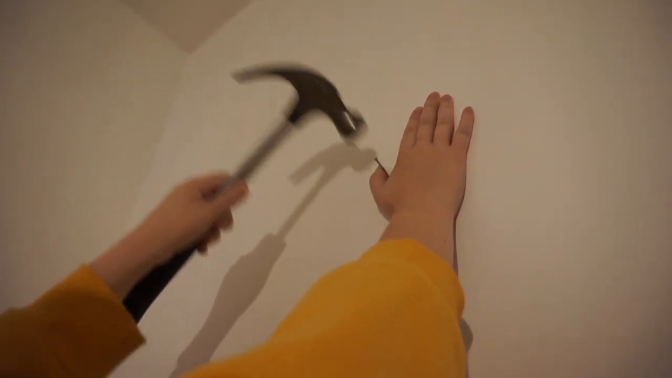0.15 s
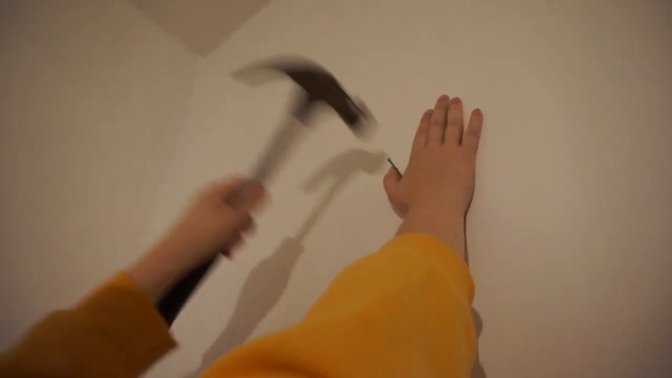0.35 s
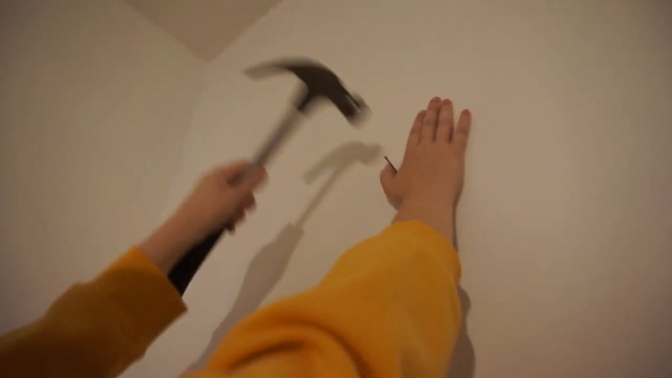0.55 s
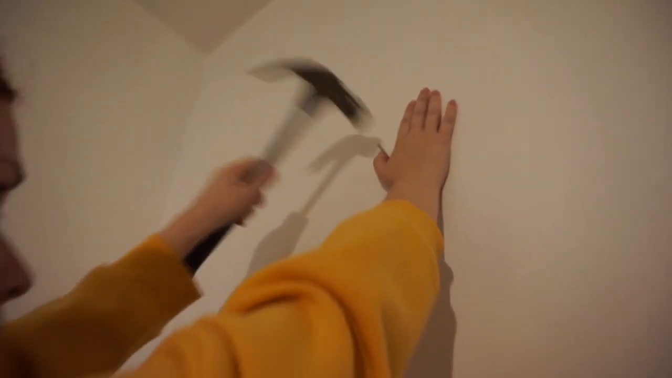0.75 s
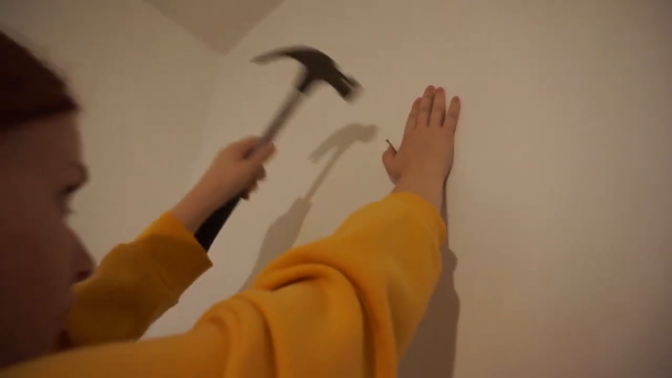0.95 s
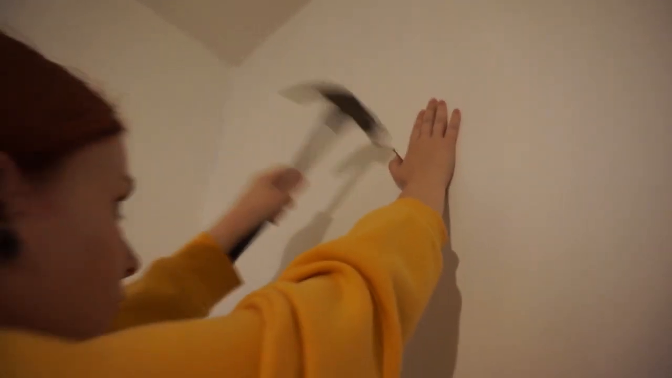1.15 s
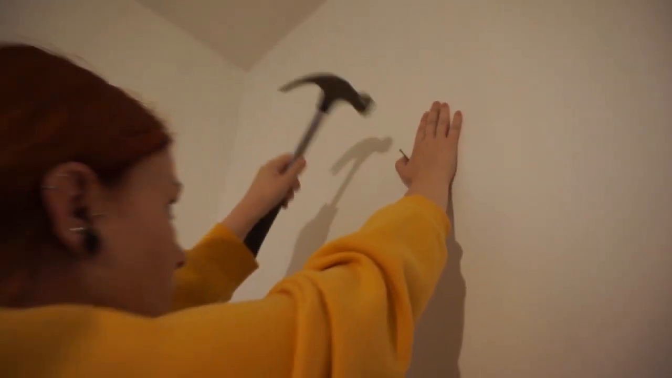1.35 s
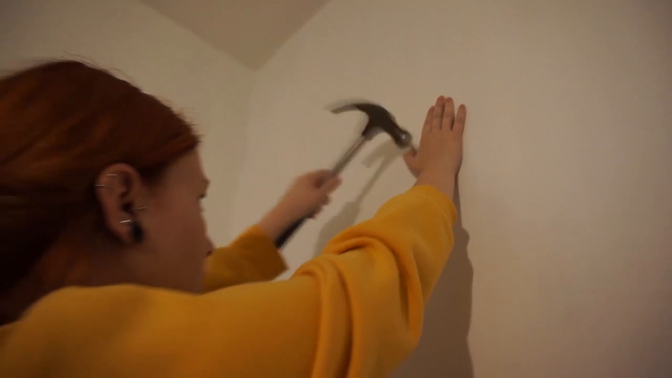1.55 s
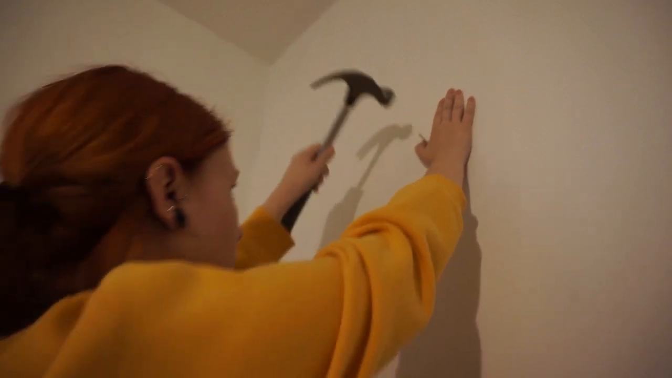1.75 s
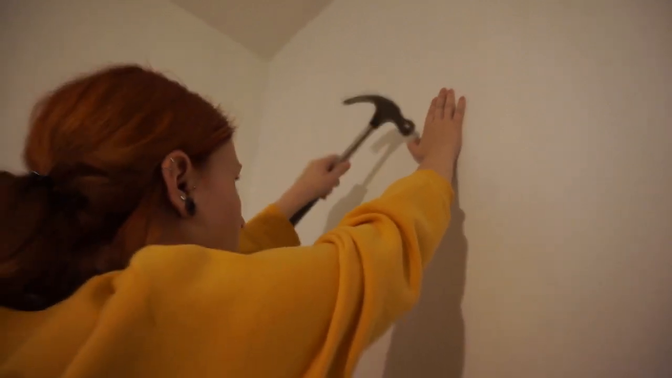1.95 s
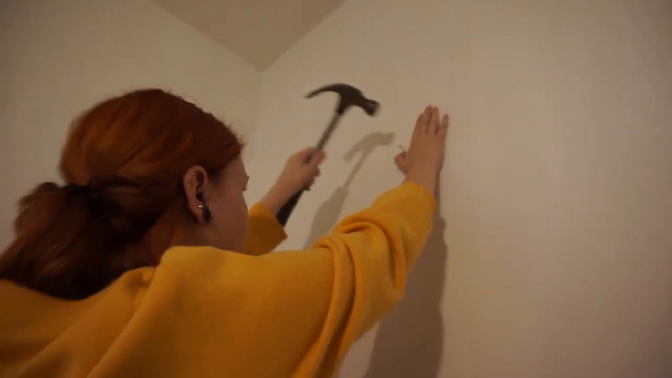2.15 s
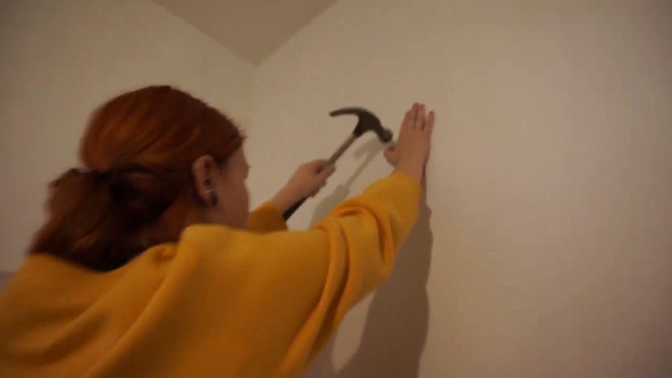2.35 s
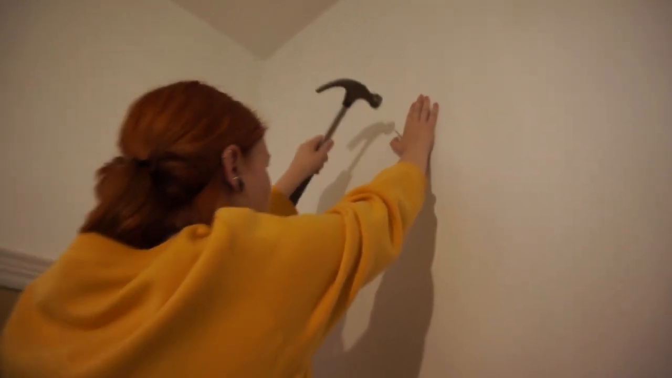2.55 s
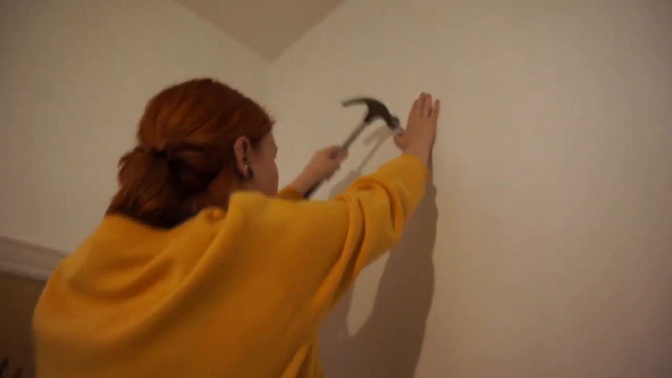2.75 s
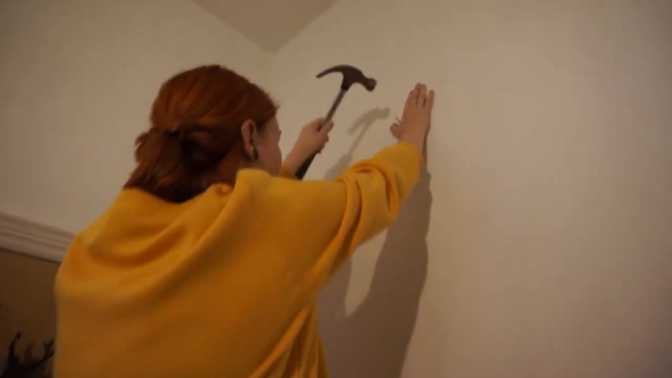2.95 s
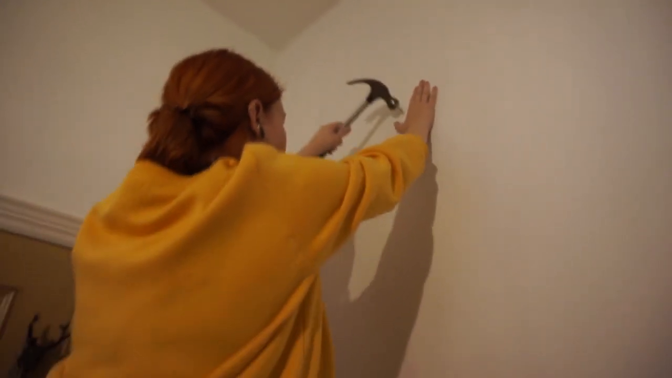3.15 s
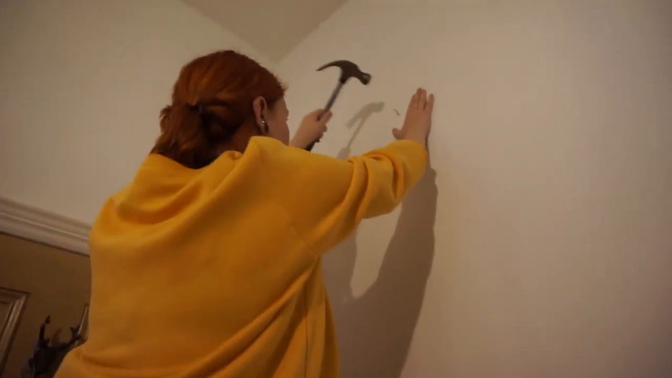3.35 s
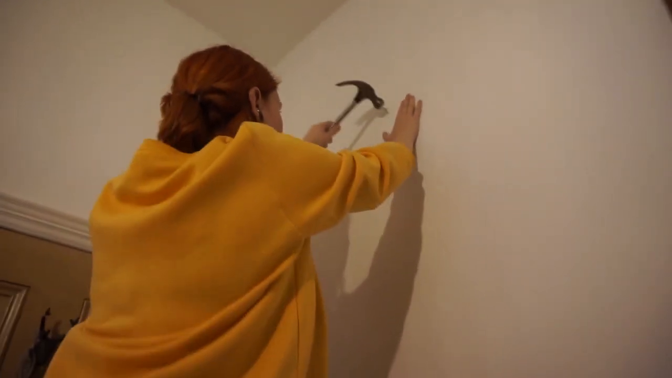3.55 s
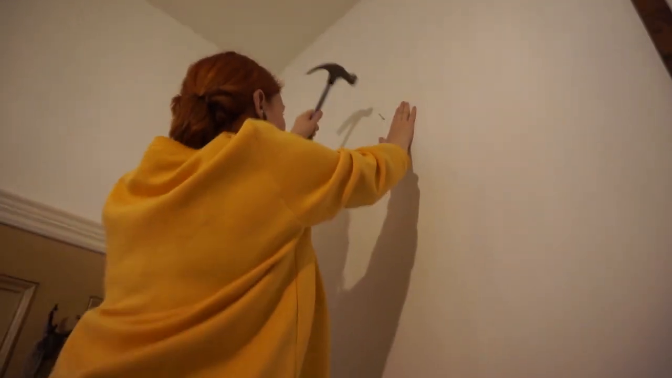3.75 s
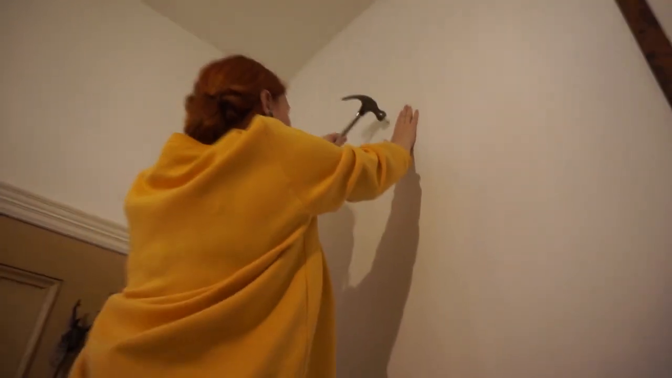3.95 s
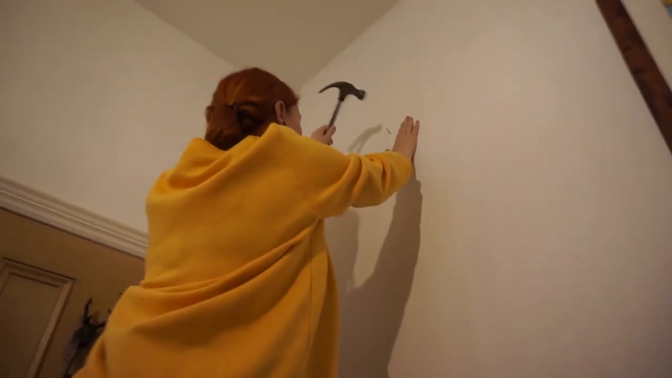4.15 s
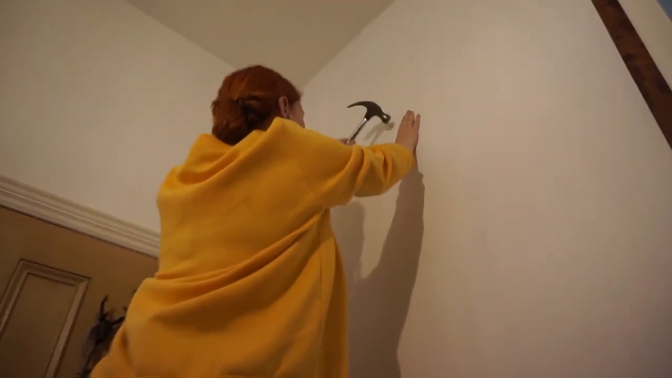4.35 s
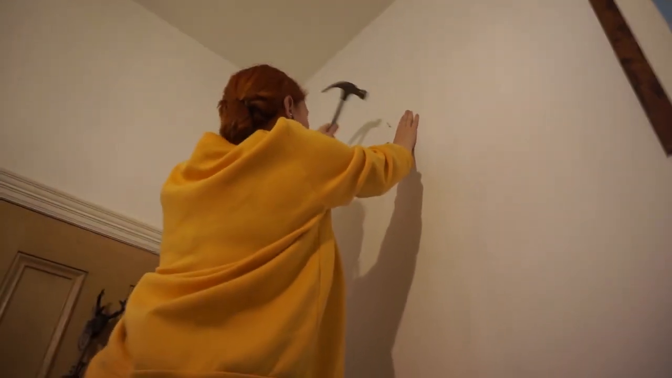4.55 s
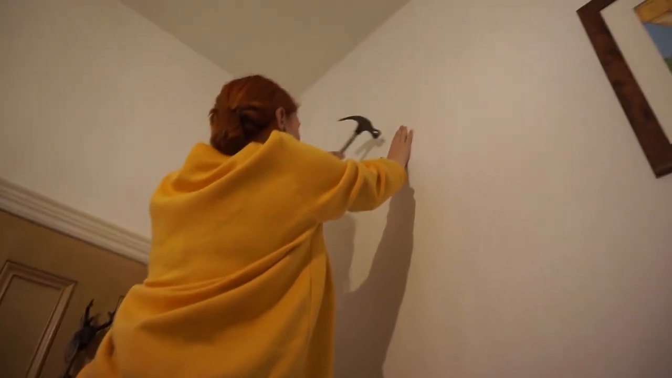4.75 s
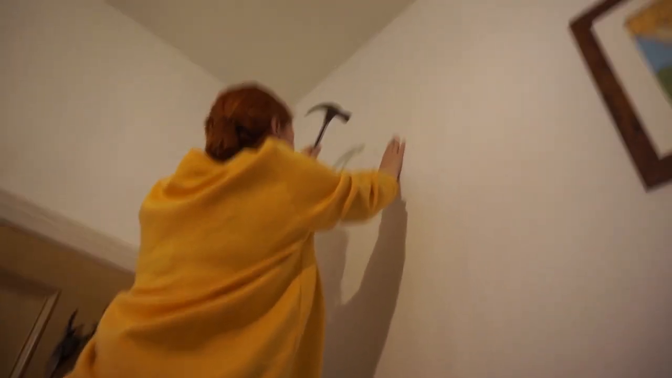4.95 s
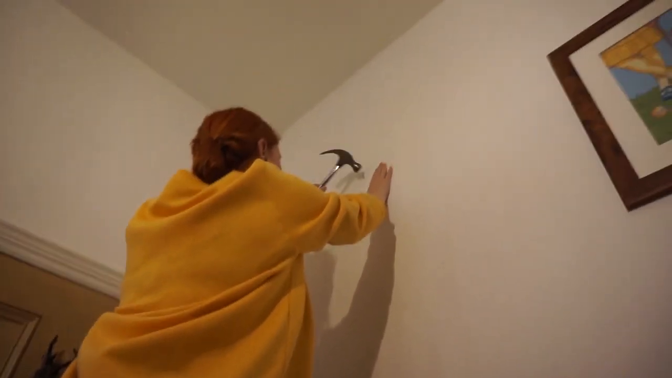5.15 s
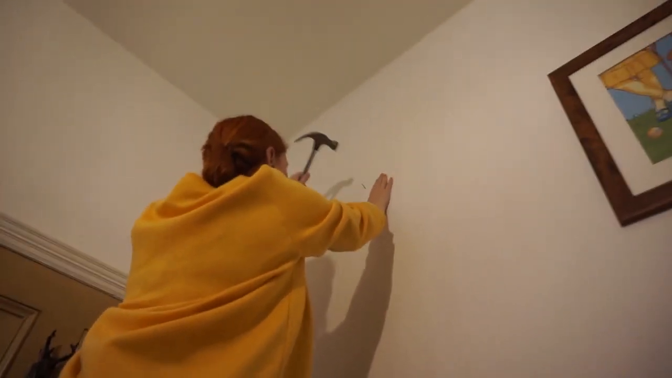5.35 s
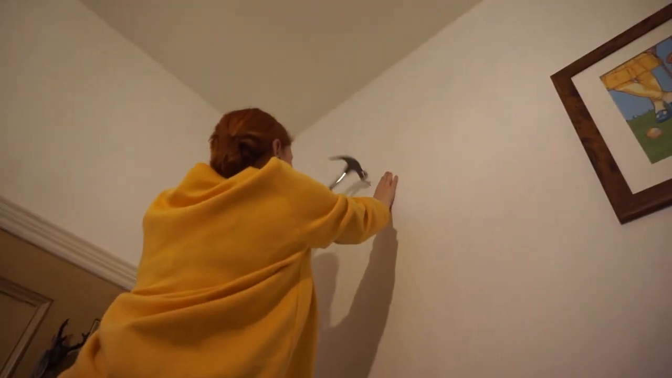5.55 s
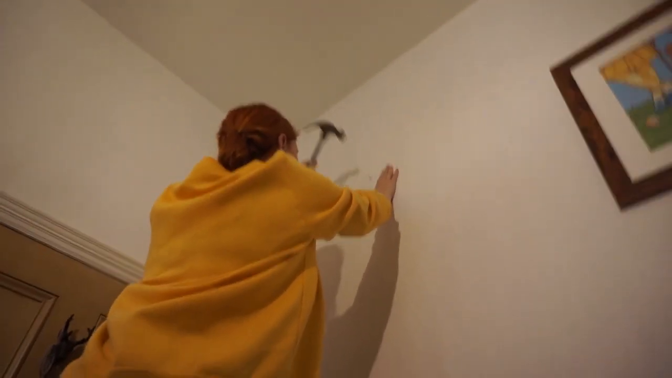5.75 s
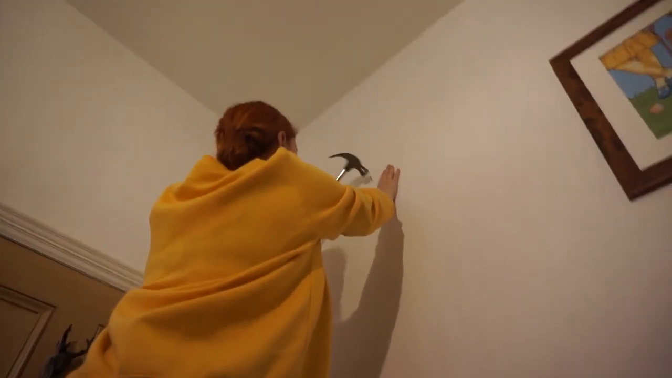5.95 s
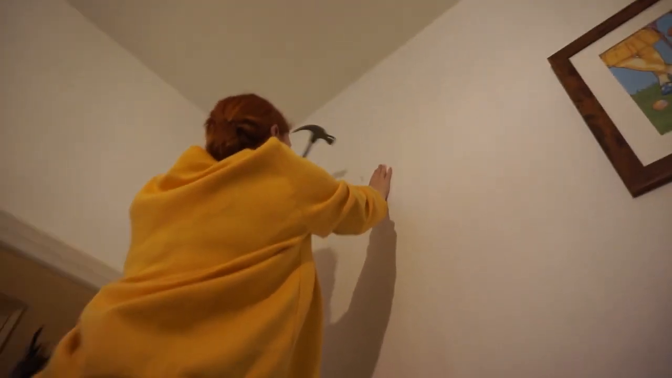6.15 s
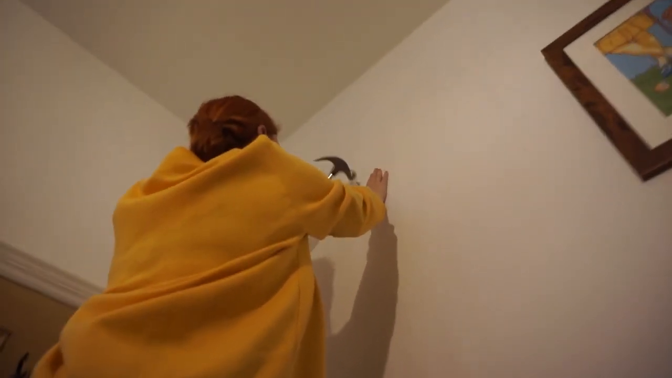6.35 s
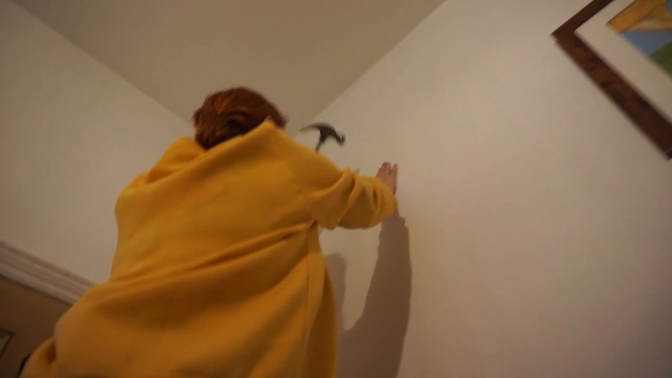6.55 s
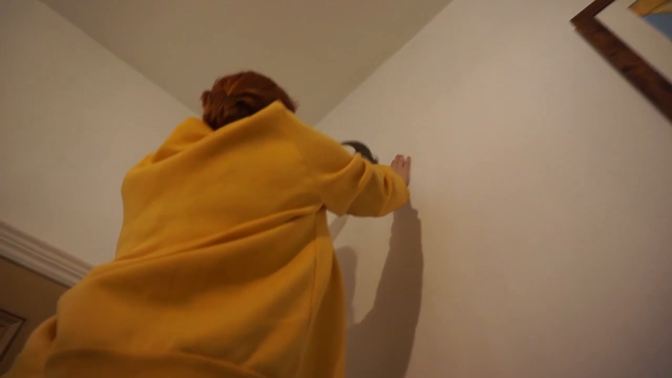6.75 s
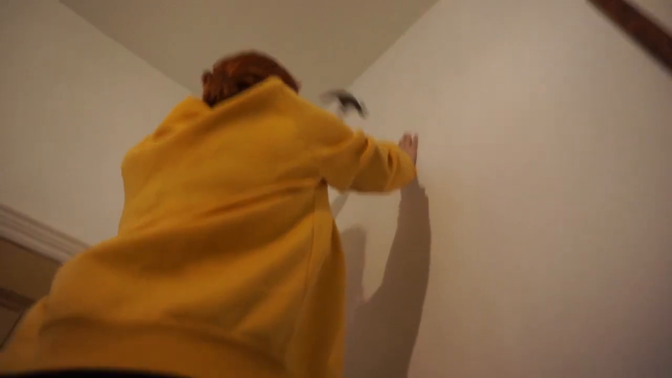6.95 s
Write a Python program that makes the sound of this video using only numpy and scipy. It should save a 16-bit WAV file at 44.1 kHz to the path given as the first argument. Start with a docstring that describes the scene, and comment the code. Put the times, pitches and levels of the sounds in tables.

```python
"""Near the corner of a room, a claw hammer drives a nail into a painted wall, about 2.5 blows a second.
The first taps are bright and the free shank sings in its bending modes; as the nail sinks, the wall
takes over with a hollow knock. Ceiling and side wall reflect at once, then the room reverberates.
Over a faint hiss, something small and hard clacks once just after a blow, and later a focus motor
chirps faintly beside the microphone."""
import sys
import numpy as np
from scipy import signal
from scipy.fft import rfft, irfft
from scipy.io import wavfile

SR = 44100
rng = np.random.default_rng(int(sys.argv[2]) if len(sys.argv) > 2 else 0)


def wav_record(signal):
    """Record a signal, one row per channel, as 16-bit PCM in the file named by sys.argv[1]."""
    frames = np.transpose(np.atleast_2d(signal))
    bounded = np.clip(frames, -1, 1)
    # unit amplitude maps onto the largest positive 16-bit level
    quanta = np.round(bounded * 32767).astype(np.int16)
    wavfile.write(sys.argv[1], SR, quanta)


N = 312915
BLOW_S, FFT_SIZE = 0.8, 2 ** 16
AGE = np.arange(int(BLOW_S * SR)) / SR   # time since an impact, t/s
HZ = np.maximum(np.fft.rfftfreq(FFT_SIZE, 1 / SR), 1)


def from_db(db):
    """Amplitude ratio of a level: tenfold for every 20 dB."""
    return 10 ** (np.asarray(db) / 20)


def at_hz(points, hz):
    """Interpolation of (f/Hz, value) points on a logarithmic frequency axis."""
    points = np.array(points)
    return np.interp(np.log(hz), np.log(points[:, 0]), points[:, 1])


def hump(hz, octaves):
    """Gaussian bell of height 1 on the logarithmic frequency axis."""
    return np.exp(-(np.log2(HZ / hz) / octaves) ** 2)


def glide(from_hz, to_hz, share):
    """Geometric interpolation: equal shares span equal pitch intervals."""
    return from_hz * (to_hz / from_hz) ** share


def panned(db):
    """Left and right gains for an interchannel level difference, positive to the left."""
    return from_db(np.array([[db], [-db]]) / 2)


def causal(db):
    """Minimum-phase response with these levels: no sound precedes its cause."""
    cepstrum = irfft(np.log(from_db(db)))
    cepstrum[1:FFT_SIZE // 2] *= 2
    cepstrum[FFT_SIZE // 2 + 1:] = 0
    return np.exp(rfft(cepstrum))


def to_time(spectrum):
    """Inverse Fourier transform, one blow long, faded over the last 0.1 s."""
    return irfft(spectrum)[:, :len(AGE)] * np.minimum((BLOW_S - AGE) * 10, 1)


def add(out, sound, start_s):
    """Linear superposition of a stereo sound from start_s on."""
    at = int(round(start_s * SR))
    first, last = max(at, 0), min(at + sound.shape[1], N)
    out[:, first:last] += sound[:, first - at:last - at]


def mode(hz, db, t60, phase):
    """Free vibration of a damped oscillator whose resonance peak stands at db."""
    tau = t60 / np.log(1000)
    return from_db(db) * 2 / (tau * SR) * np.exp(-AGE / tau) * np.sin(2 * np.pi * hz * AGE + phase)


def joint_colour(grip, seat, trough_db=-7, knock_db=9):
    """Coupling of nail and board: a treble trough falls with the grip, a knock rises as the nail seats."""
    takeover = np.clip(seat / 0.33, 0, 1)
    trough = trough_db * hump(glide(11200, 5340, grip), octaves=0.44)
    knock = knock_db * hump(glide(380, 545, seat), octaves=0.72)
    return (1 - takeover) * trough + takeover * knock


def stroke_colour(bright_db, null_hz, null_db=-11, lobe_db=4):
    """Finite contact time leaves a spectral null with a lobe above it; a squarer hit is brighter."""
    tilt = at_hz([(700, 0), (3500, bright_db)], HZ)
    return tilt + null_db * hump(null_hz, octaves=0.16) + lobe_db * hump(1.267 * null_hz, octaves=0.16)


def linger():
    """Group delay: all-pass resonances stretch a click into a burst of a few cycles."""
    # resonances of nail and board: f/Hz, bandwidth/Hz
    resonances = [(2400, 510), (4000, 840), (6000, 1200)]
    response = 1
    for hz, width_hz in resonances:
        pole = hz ** 2 - HZ ** 2 + 1j * HZ * width_hz
        response = response * np.conj(pole) / pole
    return response


def contact(depth, bright_db, null_hz, grip_depth=0.6):
    """Impact excitation: the spectrum passes from free to gripped to seated as the nail sinks."""
    # contact while the nail stands free: f/Hz, level/dB
    free = [(140, 1.5), (290, 10), (550, 6), (1000, -2.5), (2300, -0.5), (4200, 5.5), (6500, -2),
            (10000, -10)]
    # contact once the wall grips the shank: f/Hz, level/dB
    gripped = [(140, 8.5), (290, 16.5), (550, 14.5), (1000, 11), (2300, 2.5), (4200, 5), (6500, 2),
               (10000, -5.5)]
    # contact with the nail driven home: f/Hz, level/dB
    seated = [(140, 1), (290, 11), (550, 16.5), (1000, 14.8), (2300, 6.7), (4200, -8), (6500, -22.5),
              (10000, -19)]
    # radiation of any blow by the wall: f/Hz, level/dB
    radiation = [(30, -35), (72, -19.5), (108, -3.5), (230, -4.5), (285, -3.5), (325, -9), (385, -3),
                 (490, -0.5), (680, -0.5), (950, -1.5), (1600, -8), (2200, -3), (5000, -5), (11000, -7.5)]
    grip = np.clip(depth / grip_depth, 0, 1)
    seat = np.clip((depth - grip_depth) / (1 - grip_depth), 0, 1)
    stage_db = (1 - grip) * at_hz(free, HZ) + (grip - seat) * at_hz(gripped, HZ) + seat * at_hz(seated, HZ)
    colour_db = joint_colour(grip, seat) + stroke_colour(bright_db, null_hz) + at_hz(radiation, HZ)
    return causal(stage_db + colour_db) * linger()


def direct_path(time_s, low_hz=500, high_hz=3000, bass_hz=330, jitter_s=0.00013):
    """Interference of direct sound and two reflections; the shoulder increasingly shadows the treble."""
    # direct sound against the room: t/s, level at low_hz/dB, level at high_hz/dB
    shadow = [(0, -7.5, 6), (1.202, -3.5, 5.5), (2.999, -7.5, 3), (4.4, -5, 1), (5.2, -0.5, -3),
              (7.1, -3, -9)]
    # reflections from ceiling and side wall: delay/s, relative gain, left minus right/dB
    echoes = [(.0033, 1, 7), (.0053, 0.37, -16.5)]
    times, lows, highs = np.transpose(shadow)
    low_db, high_db = np.interp(time_s, times, lows), np.interp(time_s, times, highs)
    shade_db = at_hz([(low_hz, low_db), (high_hz, high_db)], HZ)
    bass_cut_db = -10 * np.log10(1 + (bass_hz / HZ) ** 2)
    mirror = from_db(at_hz([(low_hz, -7), (high_hz, 0)], HZ))   # short waves reflect cleanly
    paths, power = np.ones((2, 1)), 1
    for delay, gain, pan_db in echoes:
        lag = delay + jitter_s * (rng.normal() + 0.1 * rng.normal(size=(2, 1)))
        paths = paths + gain * mirror * panned(pan_db) * np.exp(-2j * np.pi * HZ * lag)
        power = power + (gain * mirror) ** 2
    return causal(shade_db + bass_cut_db) * paths / np.sqrt(power)


def shank(ring_db):
    """Resonant filtering: the shank colours the click for as long as it stands free."""
    # peaks and dips of the free shank: f/Hz, width/Hz, level/dB
    bands = [(2300, 150, 5), (2900, 350, -7), (3800, 180, 4), (4350, 280, 5), (5350, 250, 5),
             (6500, 800, 7), (9800, 1300, -7)]
    freedom = np.clip(0.5 + ring_db / 24, 0, 1)
    colour_db = sum(db * np.exp(-((HZ - hz) / width_hz) ** 2) for hz, width_hz, db in bands)
    return causal(freedom * colour_db)


def plaster_crunch(share=0.39, decay_s=0.0018, above_hz=1500):
    """Friction noise: a brief slip through plaster roughens the treble of a click."""
    grit = rng.standard_normal(len(AGE)) * np.exp(-AGE / decay_s)
    noisy_share = share / (1 + (above_hz / HZ) ** 2)
    return np.sqrt(1 - noisy_share) + np.sqrt(noisy_share) * rfft(grit / np.linalg.norm(grit), FFT_SIZE)


def wall(modes, phases, build_s=0.012, scatter_db=2.5):
    """Panel modes build up as bending waves cross the wall; each blow weights them anew."""
    ringing = sum(mode(hz, db + scatter_db * rng.normal(), t60, phase)
                  for (hz, db, t60), phase in zip(modes, phases))
    return rfft(ringing * (1 - np.exp(-AGE / build_s)), FFT_SIZE)


def steel(modes, spread, count):
    """Beating: clusters of close steel modes, each reaching the two ears with different phases."""
    out = 0
    for hz, db, t60 in modes:
        for offset in np.linspace(-1, 1, count) + rng.uniform(-0.12, 0.12, count):
            phase = rng.uniform(0, 2 * np.pi) + rng.normal(0, 0.57, (2, 1))
            out = out + mode(hz * (1 + spread * offset), db, t60, phase)
    return out / np.sqrt(count)


def room_tail(gap_s=0.0063, build_s=0.0025):
    """Diffuse field: third-octave noise bands, each decaying exponentially at its own rate."""
    # reverberation time: f/Hz, T60/s
    decay = [(100, 0.39), (260, 0.38), (700, 0.48), (1200, 0.61), (2200, 0.59), (4500, 0.4333),
             (7000, 0.4465), (11000, 0.4054)]
    # strength of the reverberation: f/Hz, level/dB
    levels = [(100, -1), (300, 4), (550, -4.5), (1000, 0.5), (4000, 1.5), (11000, 0.5)]
    # stereo width: f/Hz, side against mid/dB
    width = [(120, -23), (250, -18.5), (500, -10), (1000, -5), (2000, 1), (10000, -2)]
    out = np.zeros((2, len(AGE)))
    white = rfft(rng.standard_normal((2, FFT_SIZE)))
    edges_hz = np.geomspace(20, 16000, 30)
    swell = 1 - np.exp(-np.maximum(AGE - gap_s, 0) / build_s)
    for low, high in zip(edges_hz, edges_hz[1:]):
        hz = np.sqrt(low * high)
        band = irfft(white * ((HZ >= low) & (HZ < high)))[:, :len(AGE)]
        band = band * swell * from_db(-60 * AGE / at_hz(decay, hz))
        energy = np.sum(band ** 2, axis=1, keepdims=True)
        mid, side = band * np.sqrt(2 * (high - low) / SR / energy)
        out += from_db(at_hz(levels, hz)) * (mid + from_db(at_hz(width, hz)) * side * [[1], [-1]])
    return rfft(out, FFT_SIZE)


def hammering(free_ring_db=4, ring_loss_db=52):
    """Convolution: each blow excites direct path, wall and a room that shifts as the microphone moves."""
    # hammer blows: t/s, relative level/dB, brightness/dB, contact null f/Hz
    blows = [(-0.25, 2, 0, 680), (0.1127, 0.5, 0, 674), (0.4647, -0.5, 0.5, 640), (0.8524, -1, 0.5, 650),
             (1.2465, -0.05, -1.5, 637), (1.6119, 0.6, 0, 555), (2.002, 0, 1, 548),
             (2.3893, 1.15, -0.5, 570), (2.7726, 1, -2, 605), (3.171, -0.46, -2, 560),
             (3.571, -0.5, 0.5, 585), (3.9869, 0, 1.5, 523), (4.381, 0.5, 0.5, 502), (4.7754, 1.5, 0, 1080),
             (5.1862, 1.8, -2.2, 1050), (5.5917, -0.5, -2.5, 1214), (5.9989, -0.5, -1, 1330),
             (6.3972, 0.2, 0, 1450), (6.8063, -1, 2, 1430)]
    # sinking of the nail: t/s, share of its travel
    travel = [(0.11, 0.03), (1.25, 0.13), (2.77, .39), (4.38, 0.62), (4.78, 0.69), (5.19, 0.83),
              (5.59, 0.92), (6.81, 0.99)]
    # modes of the wall panel: f/Hz, level/dB, T60/s
    wall_modes = [(120.5, 7.5, 0.34), (170.8, 11, 0.4), (220.4, 11.5, 0.53), (266.3, 2, 0.22),
                  (288.3, 5.5, 0.4), (345.7, 7.5, .36), (389, 7, 0.35), (450, 11, 0.42), (489.5, 9, 0.24),
                  (662, 9.5, 0.22), (895, 8, 0.54), (1240, 11, 0.22), (1370, 9.5, .7), (2550, 6, 0.61),
                  (3670, 6, .7)]
    # bending modes of the free shank: f/Hz, level/dB, T60/s
    nail_modes = [(1930, 15, 0.9), (2200, 18, 0.66), (2300, 21.5, 0.75)]
    # blows that set the steel singing: t/s, f/Hz, level/dB, T60/s, relative spread of the cluster
    steel_rings = [(2.7725, 4850, 9, .45, 0.036), (4.382, 10000, 15.5, 0.29, 0.036),
                   (4.776, 7550, 14, 0.38, 0.067), (5.184, 8920, 14.5, .42, 0.02),
                   (5.5915, 8900, 4, 0.32, .02)]
    out = np.zeros((2, N))
    tails = [room_tail() for _ in range(7)]
    phases = rng.uniform(0, 2 * np.pi, len(wall_modes))
    for start_s, strength_db, bright_db, null_hz in blows:
        depth = np.interp(start_s, *np.transpose(travel))
        ring_db = free_ring_db - ring_loss_db * depth
        progress = np.clip(start_s * SR / N, 0, 0.999)
        place, between = divmod(progress * (len(tails) - 1), 1)
        tail = np.sqrt(1 - between) * tails[int(place)] + np.sqrt(between) * tails[int(place) + 1]
        click = direct_path(start_s) * shank(ring_db) * plaster_crunch()
        response = click + tail + wall(wall_modes, phases)
        knock = to_time(contact(depth, bright_db, null_hz) * response)
        ring = from_db(ring_db) * steel(nail_modes, spread=0.013, count=3)
        add(out, from_db(strength_db) * (knock + ring), start_s)
    for start_s, hz, db, t60, spread in steel_rings:
        add(out, steel([(hz, db, t60)], spread, count=5), start_s)
    return out


def room_floor(level_db=-74, side_db=-5):
    """Stationary noise: still air and microphone hiss lie faintly under everything."""
    # spectral density of the hiss: f/Hz, relative level/dB
    density = [(30, -17.5), (100, -7), (300, 6), (900, 1.5), (2500, 7), (4000, 0), (7000, -7.5),
               (11000, -11.5)]
    hz = np.maximum(np.fft.rfftfreq(N, 1 / SR), 1)
    white = rfft(rng.standard_normal((2, N)))
    mid, side = irfft(white * from_db(at_hz(density, hz)), N)
    return from_db(level_db) * (mid + from_db(side_db) * side * [[1], [-1]]) / np.std(mid)


def stray_clack(start_s=4.0815, rattle_s=0.026, room_db=-10):
    """Impact and rebound: something small and hard rattles to rest, so near that direct sound dominates."""
    # spectrum of the impact: f/Hz, level/dB
    colour = [(40, -14), (130, -17), (300, -2), (700, 3), (1300, 2), (2400, 14), (4400, 6), (6800, -5),
              (8500, -2), (11000, -12)]
    # bounces: delay/s, gain
    bounces = [(0, .55), (.0097, .3), (.0118, .16), (.026, .22)]
    out = np.zeros((2, N))
    strikes = sum(gain * np.exp(-2j * np.pi * HZ * delay) for delay, gain in bounces)
    mid, side = rng.standard_normal((2, len(AGE))) * np.exp(-AGE / rattle_s)
    rattle = (mid + side * [[0.5], [-0.5]]) / np.linalg.norm(mid)
    room = from_db(room_db) * room_tail()
    response = strikes * plaster_crunch() + rfft(rattle, FFT_SIZE) + room
    add(out, to_time(causal(at_hz(colour, HZ)) * response), start_s)
    return out


def focus_motor(swell_s=0.0034, room_db=-5):
    """Structure-borne sound: each motor step briefly shakes the lens barrel, close to the right ear."""
    # motor steps: t/s, relative level/dB
    steps = [(5.0469, -54), (5.0637, -49), (5.1113, -46), (5.1342, -45), (5.388, -45.5), (5.424, -46.5),
             (5.5126, -49), (5.5348, -48)]
    # resonances of the barrel: f/Hz, relative level/dB
    barrel = [(900, -4), (1335, 0.5), (2900, -26), (3620, -20.5)]
    out = np.zeros((2, N))
    envelope = (AGE / swell_s * np.exp(1 - AGE / swell_s)) ** 2
    response = panned(db=-8) + from_db(room_db) * room_tail()
    for start_s, step_db in steps:
        tones = sum(from_db(db) * np.sin(2 * np.pi * (hz * AGE + rng.random())) for hz, db in barrel)
        chirp = to_time(rfft(tones * envelope, FFT_SIZE) * response)
        add(out, from_db(step_db) * chirp, start_s)
    return out


def scene():
    """Superposition of all sources, with hammering and clack shifted a little to the right."""
    return (hammering() + stray_clack()) * panned(db=-0.9) + focus_motor() + room_floor()


def record(dry, cutoff_hz=11200):
    """Band limiting: an elliptic low-pass cuts the top steeply."""
    return signal.sosfilt(signal.ellip(10, 0.2, 70, cutoff_hz, fs=SR, output="sos"), dry)


dry = scene()
out = record(dry)
wav_record(out)
```